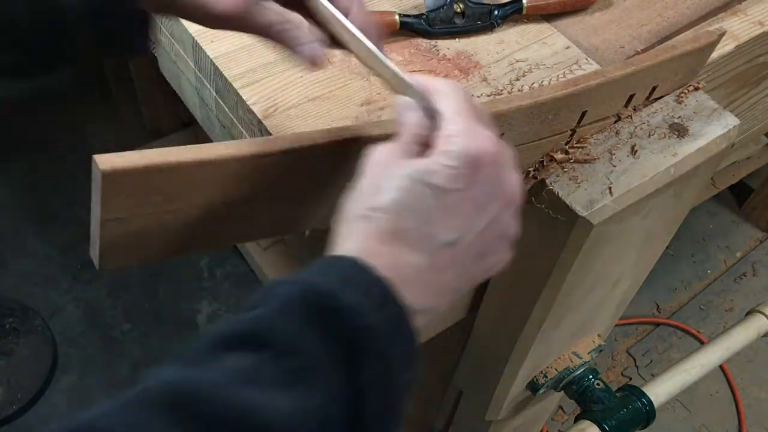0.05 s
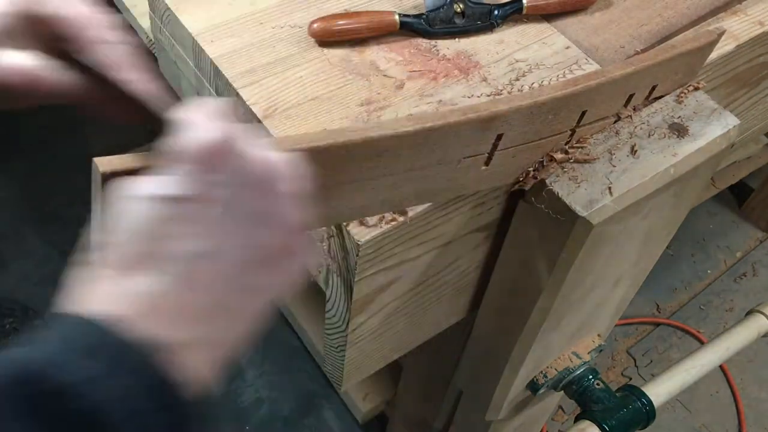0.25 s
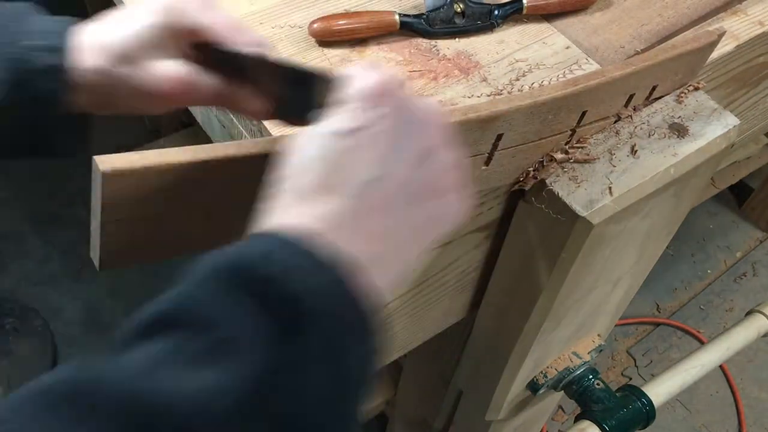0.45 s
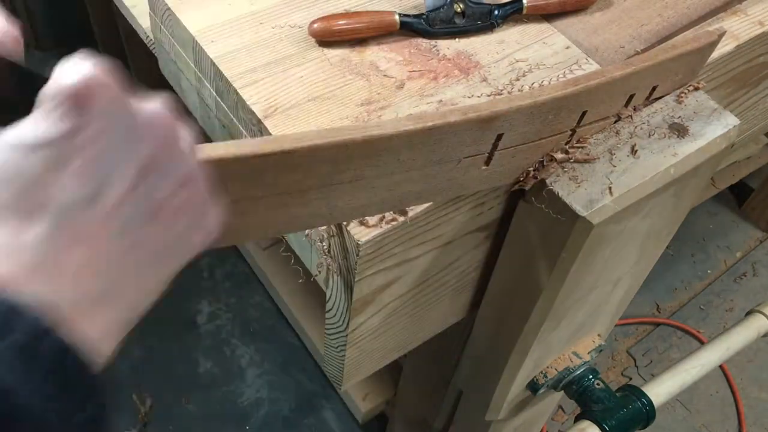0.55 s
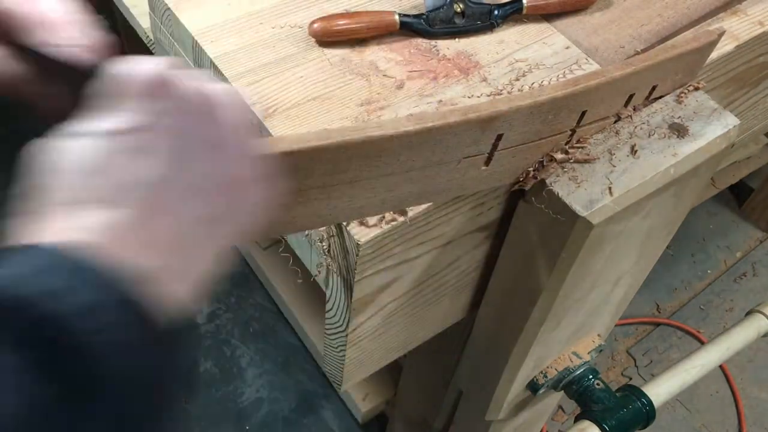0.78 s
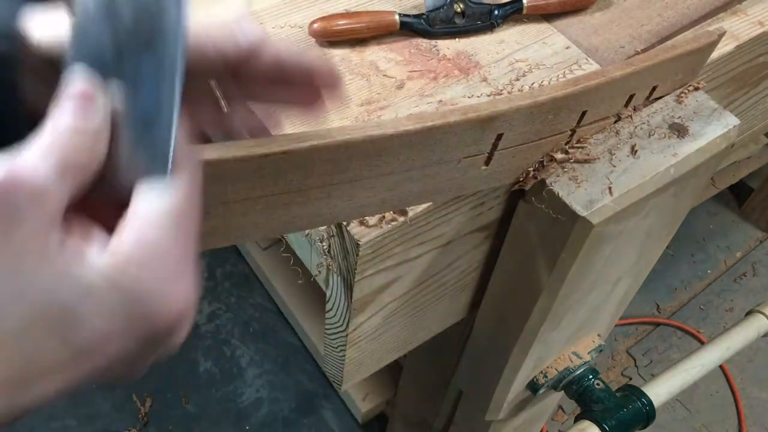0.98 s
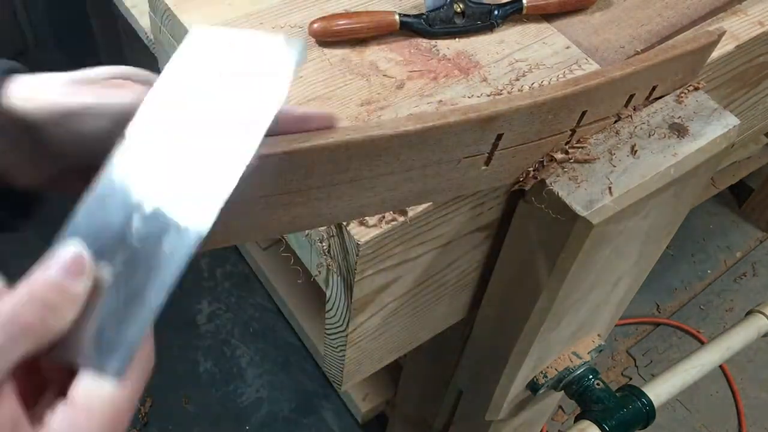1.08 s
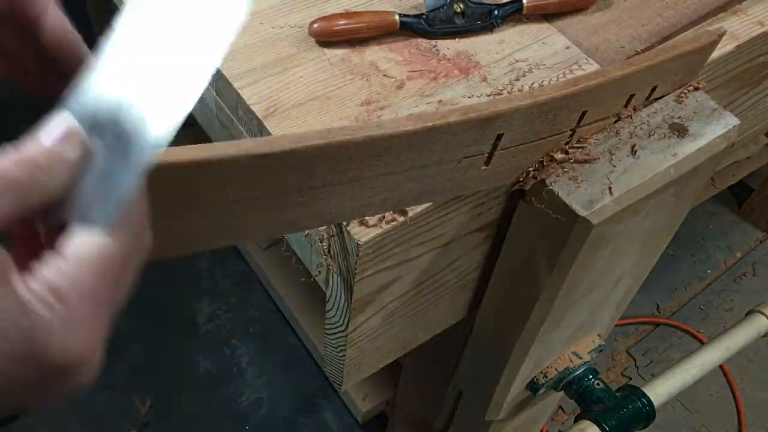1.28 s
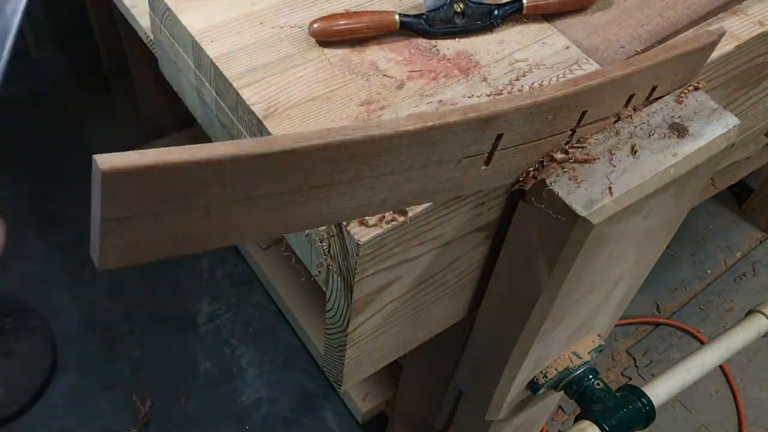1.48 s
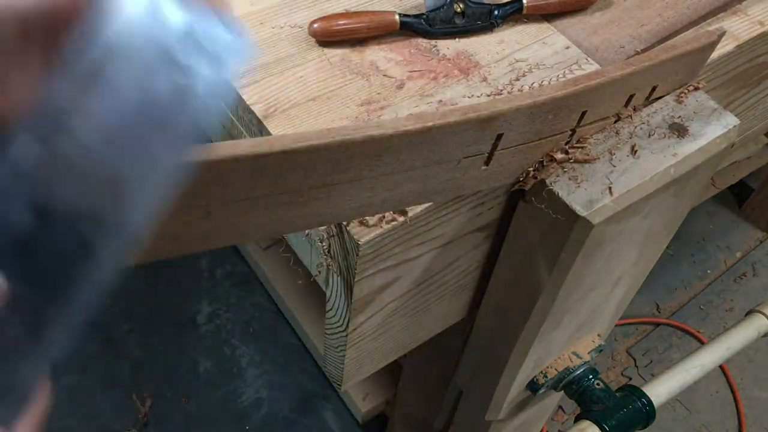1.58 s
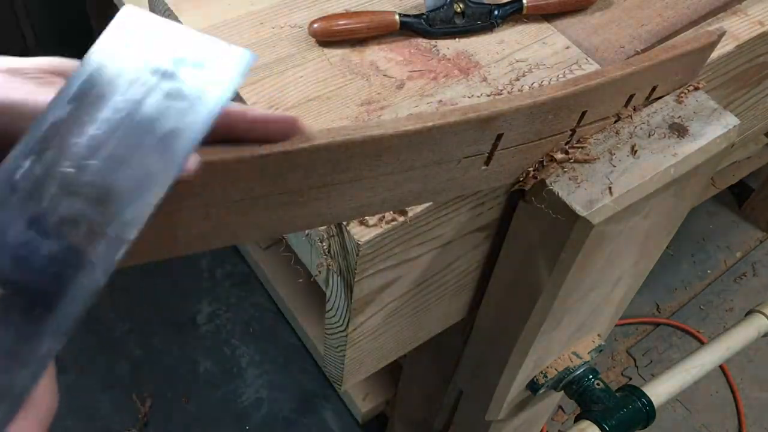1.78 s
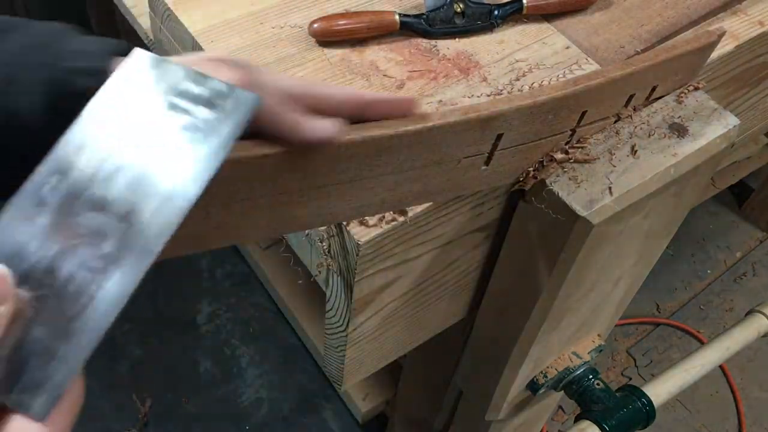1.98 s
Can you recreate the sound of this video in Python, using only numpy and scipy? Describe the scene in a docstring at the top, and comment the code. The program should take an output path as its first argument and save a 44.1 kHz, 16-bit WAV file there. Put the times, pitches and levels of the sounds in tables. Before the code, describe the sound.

Three quick scrapes of steel on hardwood, then faint handling of the blade.

```python
"""A faint brush of fingers, then a knock and a swelling rasp, three times over: a steel card scraper
pushed along a hardwood board in a bench vice, close by in a small workshop. Each stroke speeds up,
and tearing fibres ring the board and the card until the edge runs off and the bench shudders.
Then fingers shift on the card and slip off its edge with a ping, and a palm slides over the wood.
Underneath, sleeves rustle and the arms push slow air through the quiet room."""
import sys
import numpy as np
from scipy import signal
from scipy.fft import rfft, irfft
from scipy.io import wavfile
from scipy.ndimage import uniform_filter1d

SR = 44100
rng = np.random.default_rng(int(sys.argv[2]) if len(sys.argv) > 2 else 0)


def to_wav(s):
    """Save 16-bit WAV."""
    ch = np.atleast_2d(s).T  # columns
    pcm = np.round(np.clip(ch, -1, 1) * 32767)  # PCM
    wavfile.write(sys.argv[1], SR, pcm.astype(np.int16))


N = 90404

# Scraper strokes: bite_s, full_speed_s, run_off_s, onset_db (against full speed), wood_db, steel_db
STROKES = [(0.17, 0.304, 0.32, -21, -33.5, -26), (.473, 0.549, 0.57, -17.5, -30.5, -23),
           (0.749, 0.826, 0.8352, -17.5, -28.5, -21.5)]
# Points of the tone curve that the grip gives a stroke: frequency_hz
GRIP_HZ = [200, 350, 800, 2000, 2700, 3800, 7300, 11500, 14000, 15500]
# The grip's tone, one row a stroke: gain_db at each of those points
GRIP_DB = [(0, 1, 0, 3, -1, 4, 2.8, -0.33, -2.5, 7.5), (0, 2, 1, 3.5, 1.5, 1.5, 0.11, 0.36, 0.38, 1),
           (3, -5.5, 0.48, 7, -3, 4, 0, 1, -2.2, -2.5)]
BITE_S, STEEL_RELEASE_S, WOOD_RELEASE_S = 0.015, 0.0016, 0.016
WOOD_SWELL = 0.91  # the wood's share of the swell in dB

def scraping():
    """Each stroke bites and swells as the card speeds up; the steel cuts off before the wood."""
    t, out = clock(), 0
    for (start, full, end, onset_db, wood_db, steel_db), grip_db in zip(STROKES, GRIP_DB):
        tear = colour(tearing_fibres(), list(zip(GRIP_HZ, grip_db)))
        swell_db = onset_db * np.clip((full - t) / (full - start), 0, 2)
        cut = undb(swell_db + steel_db) * gate(start - BITE_S, end, 2 * BITE_S, STEEL_RELEASE_S)
        push = undb(WOOD_SWELL * swell_db + wood_db)
        push *= gate(start - BITE_S, end, 2 * BITE_S, WOOD_RELEASE_S)
        rasp = (steel_edge(tear, cut) + wood_body(tear, push)) / np.sqrt(2)
        out = out + rasp + bench_shudder(end, wood_db)
    return out


FIBRES_PER_S, FIBRE_SPREAD_DB, HISS_GAIN = 7000, 5, 0.38

def tearing_fibres():
    """Fibres snap in uneven bunches: a dense, chattering crackle over hiss."""
    snaps = (rng.random(N) < FIBRES_PER_S / SR) * np.sign(noise())
    strength = undb(FIBRE_SPREAD_DB * np.minimum(rng.exponential(size=N), 3))
    return (unit(snaps * strength) + HISS_GAIN * noise()) * flutter(rate_hz=350, depth_db=0.5)


# Bright rasp of the cutting edge: frequency_hz, gain_db
EDGE_COLOUR = [(1500, -34), (2750, -44), (3100, -15.5), (3800, -6.5), (4900, -16), (5850, -0.5),
               (6750, -19), (7300, 9.5), (8000, 3.5), (8900, -6), (10200, -9), (11400, -1.5), (12300, -2.5),
               (13500, -3), (15700, -14)]
# Modes of the gripped card: pitch_hz, level_db, t60_s
GRIPPED_CARD_MODES = [(3910, -6, .025), (6040, -27, .02), (5895, -15, 0.026), (7600, -17, 0.046),
                      (7325, 12, 0.018), (7500, 11, .02), (7360, -14, 0.009), (7800, 4, .02),
                      (7640, -8, .02), (11700, 4, 0.049)]
CARD_RING_DB = -3.5

def steel_edge(tear, envelope):
    """The top of the scrape: fibres sizzle at the edge and ring the gripped card."""
    ring = convolve(envelope * tear, ringing(GRIPPED_CARD_MODES))
    return envelope * colour(tear, EDGE_COLOUR) + undb(CARD_RING_DB) * ring


# Broad tone of scraped wood: frequency_hz, gain_db
WOOD_COLOUR = [(90, -101), (200, -21), (350, -7.5), (430, 0), (600, -13.5), (740, -1), (1150, 1.5),
               (1450, -6), (2100, -8), (2700, -11), (5000, -21), (16000, -35.5)]
BOARD_RING_DB = -5.5

def wood_body(tear, envelope):
    """The body of the scrape: the same fibres rasp in the wood and ring the board."""
    return envelope * colour(tear, WOOD_COLOUR) + undb(BOARD_RING_DB) * board(envelope * tear)


# Modes of the clamped board: pitch_hz, scraped_db, struck_db, t60_s
BOARD_MODES = [(95.5, -7.5, -13, 0.14), (205.6, -6.5, 5.5, 0.19), (333.7, -6, -2, 0.25),
               (356.2, 6.5, -5, 0.074), (503, -11, 0, 0.21), (777, -1, 8.5, 0.14), (1080, -5.5, -16, 0.083),
               (1121, -3.5, -23, 0.077), (1280, -17, -20.5, 0.04), (1610, -24, -21, 0.054),
               (2050, -21, -8, 0.18)]

def board(force, struck=False):
    """The board rings under a force, with one balance of modes when scraped, another when struck."""
    modes = [(hz, struck_db if struck else scraped_db, t60)
             for hz, scraped_db, struck_db, t60 in BOARD_MODES]
    return convolve(force, ringing(modes))


BENCH_HZ, BENCH_WIDTH_HZ, BENCH_DB = 82.5, 29, -16.5

def bench_shudder(end, wood_db):
    """The bench gives a low shudder as the edge runs off."""
    rumble = unit(band(noise(), BENCH_HZ, BENCH_WIDTH_HZ))
    return undb(wood_db + BENCH_DB) * rumble * gate(end - 0.01, end, rise_s=0.03, fall_s=0.096)


# Soft bumps on the board: start_s, level_db, contact_s, scuff_db (against the bump), scuff_hz
KNOCKS = [(.147, -53, 0.0015, 8, 650), (0.157, -40.5, 0.0023, -3.5, 520), (0.234, -46, 0.0022, 0.5, 350),
          (0.45, -40.5, 0.0019, -6, 400), (.456, -45.5, 0.0016, 5, 500), (.467, -34.5, 0.0032, -7, 250),
          (.585, -40.5, 0.0042, -4, 330), (.718, -54, 0.0034, -1, 400), (0.74, -39.5, 0.0036, -7, 700),
          (1.057, -62, 0.0024, -3, 500), (1.671, -60.5, 0.0058, 4.5, 335), (1.69, -52, 0.0047, -3, 320)]
SCUFF_RISE_S, SCUFF_FALL_S, SCUFF_WIDTH_RATIO = 0.0027, 0.0095, 0.4

def knocks():
    """Card or hand bumps the board and scuffs it; longer contact leaves only the low modes."""
    out = 0
    for start, db, contact_s, scuff_db, scuff_hz in KNOCKS:
        push = np.sin(np.pi * np.clip((clock() - start) / contact_s, 0, 1)) ** 2
        scuff = band(noise(), scuff_hz, SCUFF_WIDTH_RATIO * scuff_hz)
        scuff *= gate(start, start + SCUFF_RISE_S, SCUFF_RISE_S, SCUFF_FALL_S)
        out = out + loudest(board(push, struck=True), db) + loudest(scuff, db + scuff_db)
    return out


# Sharp taps: start_s, peak_db, centre_hz, width_hz, grit_decay_s
TICKS = [(0.154, -35, 4950, 8800, 0.0024), (0.489, -33, 4900, 12000, .002), (.7185, -39, 586, 1940, 0.0012),
         (0.7186, -72, 4550, 6000, 0.00065), (.741, -25, 1020, 1810, 0.0015),
         (0.743, -28.5, 6300, 4520, 0.00099), (1.0002, -48, 796, 2197, 0.00165),
         (1.027, -49, 5950, 7000, 0.00036), (1.0572, -39.5, 1990, 900, 0.0011),
         (1.0561, -39.5, 3000, 4230, 0.0024), (1.186, -49, 800, 1600, 0.0033),
         (1.269, -51, 900, 1390, .003), (1.386, -51, 6000, 6900, .0006), (1.587, -53, 5500, 7000, 0.00053)]
GRIT_GAIN = 0.13

def ticks():
    """Steel and wood tap together: a click of first contact and a trace of grit."""
    out = 0
    for start, db, hz, width_hz, decay_s in TICKS:
        click = np.diff(clock() >= start, prepend=0)
        grit = noise() * gate(start, start, 1 / SR, decay_s)
        tap = band(click + GRIT_GAIN * grit, hz, width_hz)
        out = out + undb(db) * tap / np.abs(tap).max()
    return out


# Finger slips: start_s, level_db, swell_s, tilt_db_per_octave
PINGS = [(0.077, -60.5, 0.014, 17), (0.101, -62, 0.0046, 18), (1.496, -46, 0.008, 0)]
# Modes of the loosely held card: pitch_hz, level_db, t60_s
FREE_CARD_MODES = [(1380, -11, 0.05), (1756, -8, 0.04), (3627, 0, 0.11), (7052, 0, 0.045), (7100, -1, .04),
                   (8460, -32, 0.037), (11700, -23, 0.083)]

def pings():
    """A finger slips off the card, which swells briefly and rings out."""
    t, out = clock(), 0
    for start, db, swell_s, tilt_db in PINGS:
        ring = 0
        for hz, mode_db, t60 in FREE_CARD_MODES:
            gain = undb(mode_db + tilt_db * np.log2(hz / 1000))
            envelope = gate(start, start + swell_s, swell_s, t60 / np.log(1000))
            ring = ring + gain * np.sin(2 * np.pi * hz * t) * envelope
        out = out + loudest(ring * flutter(rate_hz=200, depth_db=1.7), db)
    return out


# Finger and palm slides: start_s, end_s, rise_s, fall_s, level_db, top_octave_db
RUBS = [(0.069, 0.098, 0.0081, 0.018, -63, -20), (0.855, 0.909, 0.028, .016, -57.5, -3),
        (1.075, 1.23, 0.037, 0.025, -60.5, -7), (1.245, 1.28, 0.015, 0.01, -58.5, -3.5),
        (1.321, 1.365, .015, 0.0064, -65, -1), (1.398, 1.403, 0.0059, 0.028, -58.5, 0.5),
        (1.445, 1.469, 0.026, 0.0208, -47, 2), (1.48, 1.503, 0.016, 0.0036, -44, 6.5),
        (1.517, 1.538, .01, 0.009, -64, -7), (1.658, 1.68, 0.017, 0.0087, -57.5, -4),
        (1.673, 2.06, 0.33, 0.063, -48.5, -4)]
# Hiss of sliding skin: frequency_hz, gain_db
SKIN_COLOUR = [(150, -12), (350, -11.5), (600, -19), (800, -15), (1700, -20), (3000, -13.5), (5200, -8.5),
               (6700, -2), (7900, 1), (9500, -5.5), (11000, -7.5), (13000, -3), (15700, -7.5)]

def skin_rubs():
    """Skin hisses unevenly over card and board, each slide with its own brightness."""
    skin = colour(noise(), SKIN_COLOUR) * flutter(rate_hz=119.4, depth_db=0.55)
    return sum(undb(db) * gate(*span) * colour(skin, [(7000, 0.021), (12000, top_db)])
               for *span, db, top_db in RUBS)


def palm_on_board():
    """Friction from the sliding palm makes the board hum faintly."""
    friction = colour(noise(), [(800, -4), (2000, -14)])
    return undb(-61.5) * gate(1.55, 2.06, rise_s=1.05, fall_s=0.05) * unit(board(friction))


# Arm movements: start_s, end_s, rise_s, fall_s, level_db
SLEEVE_MOVES = [(0.598, 0.672, 0.014, 0.016, -73), (1.024, 1.327, 0.13, 0.048, -57),
                (1.433, 1.488, 0.014, 0.059, -56.5), (1.65, 1.823, 0.016, 0.14, -65.5)]
# Soft tone of cloth: frequency_hz, gain_db
SLEEVE_COLOUR = [(40, 13.5), (100, 12), (200, -3.5), (330, -1), (600, -7.5), (1150, -10), (2000, -14.5),
                 (4000, -16.5), (8000, -28)]

def sleeves():
    """Sleeves rustle as the arms move."""
    cloth = colour(noise(), SLEEVE_COLOUR) * flutter(rate_hz=40, depth_db=1.6)
    return cloth * sum(undb(db) * gate(*span) for *span, db in SLEEVE_MOVES)


# Swell of the moving air: time_s, level_db
AIR_LEVELS = [(0, -46), (.25, -47.5), (.5, -33), (.8, -43), (1.0, -37), (1.45, -39.5), (1.7, -42.5),
              (2.05, -54.5)]
# Its sub-bass weight: frequency_hz, gain_db
AIR_COLOUR = [(4, -16.5), (9, 10.5), (18, -10.5), (30, -10), (60, -25), (120, -48.5), (400, -61),
              (2000, -110)]

def moving_air():
    """The arms push slow air, a rumble mostly below hearing."""
    return colour(noise(), AIR_COLOUR) * undb(np.interp(clock(), *np.array(AIR_LEVELS).T))


# Decay of the workshop: frequency_hz, t60_s
ROOM_DECAY = [(150, 0.74), (1000, 0.28), (4000, 0.28), (8000, 0.087), (15000, 0.17)]
WET_LOW_DB, WET_HIGH_DB, PREDELAY_S = -14.5, -23.5, 0.0043

def workshop_reverb(x):
    """The walls add a short tail, weaker and drier in the treble."""
    t, tail = clock(), 0
    edges_hz = np.geomspace(80, 16000, 9)
    hz, t60 = np.array(ROOM_DECAY).T
    for low, high in zip(edges_hz, edges_hz[1:]):
        log_centre = np.log(low * high) / 2
        fade = np.exp(-np.log(1000) * t / np.interp(log_centre, np.log(hz), t60)) * (t > PREDELAY_S)
        wet = undb(np.interp(log_centre, np.log([1200, 7000]), [WET_LOW_DB, WET_HIGH_DB]))
        wash = signal.sosfilt(signal.butter(3, [low, high], "band", fs=SR, output="sos"), noise())
        tail = tail + wet * wash * fade / np.sqrt(np.sum(fade ** 2))
    return x + convolve(x, tail)


# Bed of the quiet room: frequency_hz, gain_db
ROOM_TONE_COLOUR = [(30, -10.5), (150, -4.5), (300, -13.5), (500, -16), (780, -18.5), (1500, -22.5),
                    (4000, -29), (8400, -28), (9200, -33.5), (15700, -32)]
ROOM_TONE_DB = -65

def room_tone():
    """A steady, dark hush under everything."""
    return undb(ROOM_TONE_DB) * colour(noise(), ROOM_TONE_COLOUR)


def undb(db):
    """Decibels to gain."""
    return 10 ** (np.asarray(db) / 20)


def unit(x):
    """Scale to rms 1."""
    return x / np.sqrt(np.mean(x ** 2))


def loudest(x, db):
    """Set the level of the loudest hundredth of a second."""
    return x * undb(db) / np.sqrt(uniform_filter1d(x ** 2, SR // 100).max())


def clock():
    """Time of each sample in seconds."""
    return np.arange(N) / SR


def noise():
    """White noise."""
    return rng.standard_normal(N)


def gate(start_s, end_s, rise_s, fall_s):
    """Linear attack from the start, exponential release from the end."""
    t = clock()
    return np.clip((t - start_s) / rise_s, 0, 1) * np.exp(-np.maximum(t - end_s, 0) / fall_s)


def flutter(rate_hz, depth_db):
    """Random gain that wavers up to the given rate."""
    waver = signal.sosfilt(signal.butter(2, rate_hz, fs=SR, output="sos"), noise())
    return undb(depth_db * unit(waver))


def colour(x, points):
    """Shape a steady sound by (frequency_hz, gain_db) points; rms 1."""
    hz, db = np.array(points).T
    bins_hz = np.maximum(np.fft.rfftfreq(N, 1 / SR), 1)
    gain = undb(np.interp(np.log(bins_hz), np.log(hz), db))
    return unit(irfft(rfft(x) * gain, N))


def band(x, hz, width_hz):
    """Pass x twice through one resonance."""
    b, a = signal.iirpeak(hz, hz / width_hz, SR)
    return signal.lfilter(b, a, signal.lfilter(b, a, x))


def ringing(modes):
    """Response of (pitch_hz, level_db, t60_s) modes; the level sets each one's share of the energy."""
    t = clock()
    ring = sum(undb(db) / np.sqrt(t60) * np.sin(2 * np.pi * hz * t) * np.exp(-np.log(1000) * t / t60)
               for hz, db, t60 in modes)
    return ring / np.sqrt(np.sum(ring ** 2))


def convolve(x, response):
    """Pass x through a response."""
    return signal.fftconvolve(x, response)[:N]


def scene():
    """The work at the bench in its reverb, over moving air and room tone; mono."""
    air = moving_air()
    work = scraping() + knocks() + ticks() + skin_rubs() + sleeves() + palm_on_board() + pings()
    return (workshop_reverb(work) + air + room_tone())[None]


HIGH_CUT_HZ = 15750

def record(dry):
    """A steep high cut takes off the very top."""
    return signal.sosfilt(signal.ellip(12, 0.1, 90, HIGH_CUT_HZ, fs=SR, output="sos"), dry)


dry = scene()
out = record(dry)
to_wav(out)
```